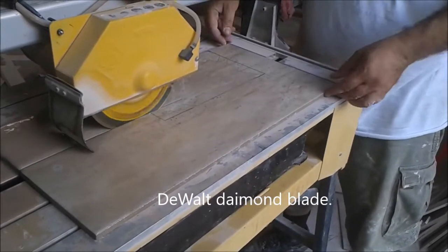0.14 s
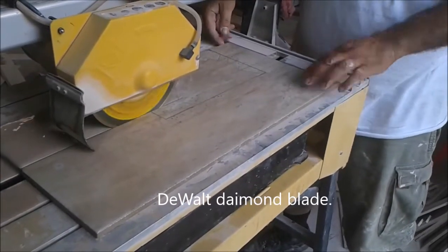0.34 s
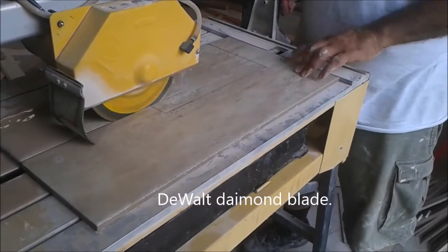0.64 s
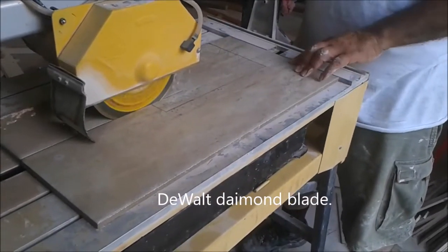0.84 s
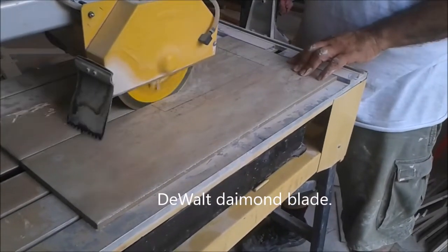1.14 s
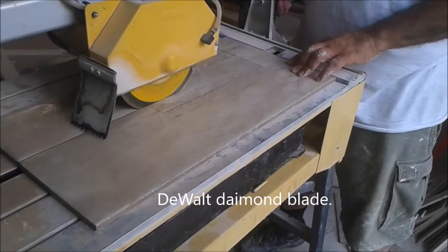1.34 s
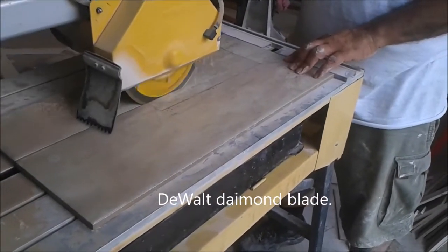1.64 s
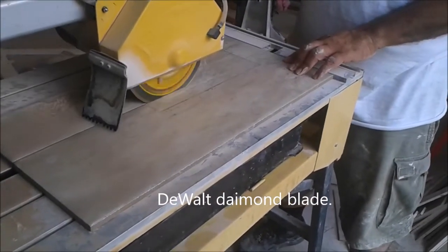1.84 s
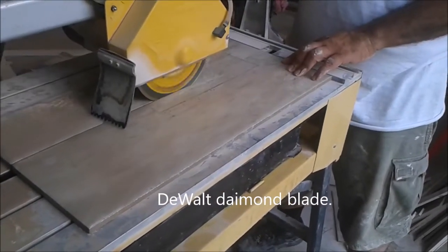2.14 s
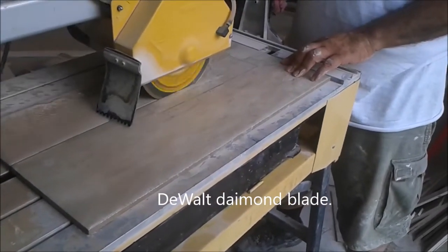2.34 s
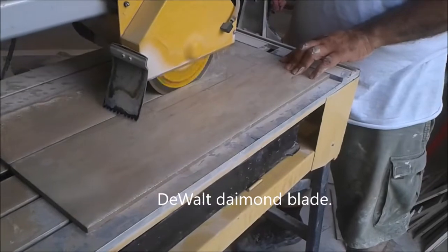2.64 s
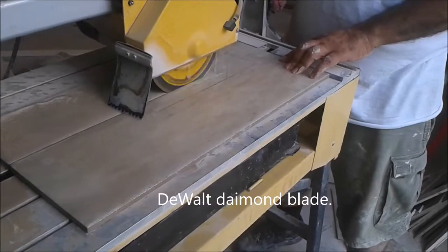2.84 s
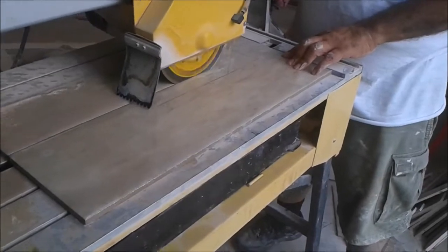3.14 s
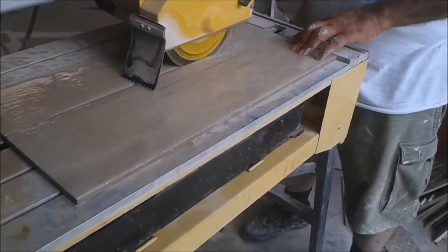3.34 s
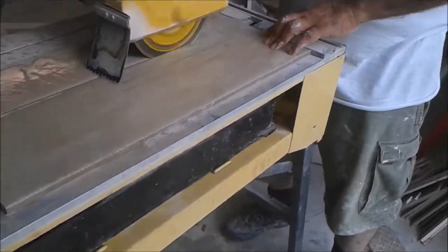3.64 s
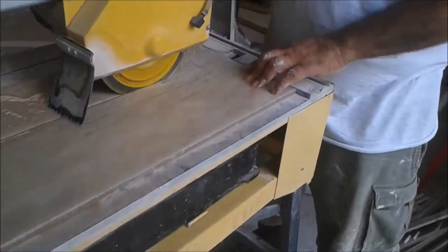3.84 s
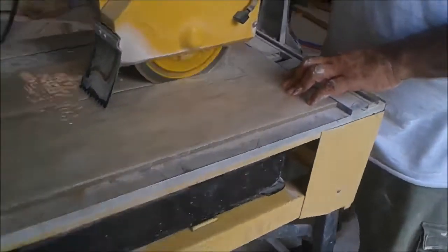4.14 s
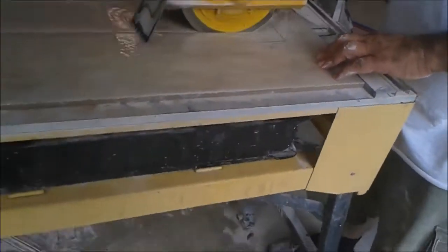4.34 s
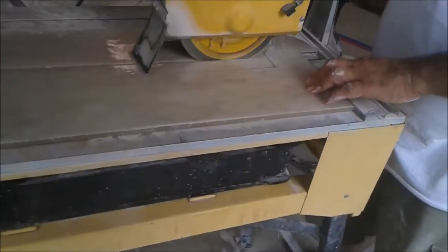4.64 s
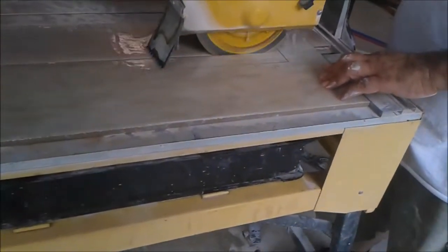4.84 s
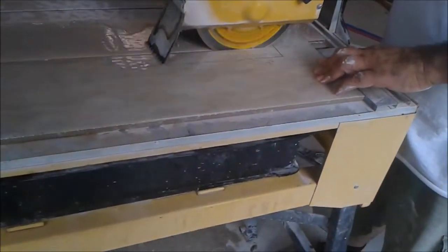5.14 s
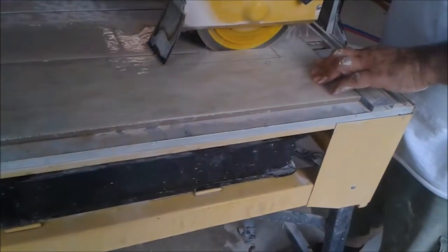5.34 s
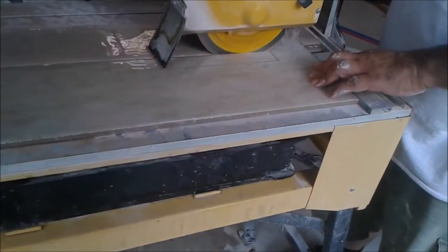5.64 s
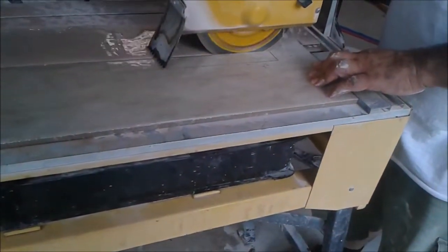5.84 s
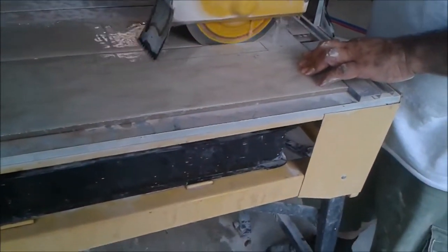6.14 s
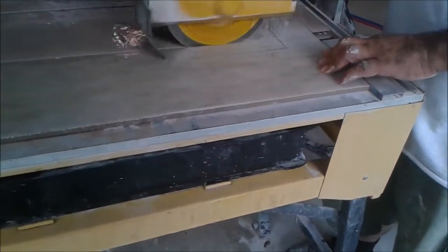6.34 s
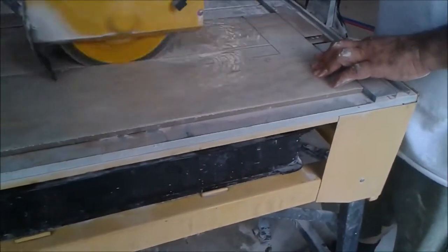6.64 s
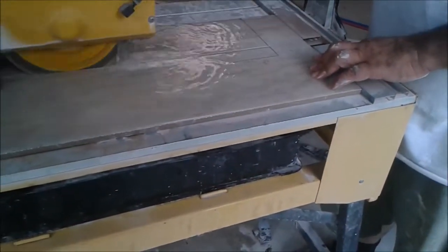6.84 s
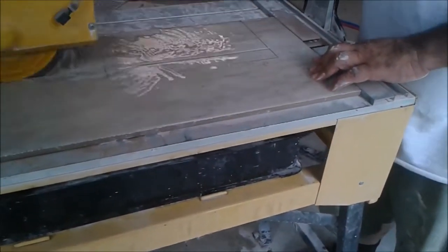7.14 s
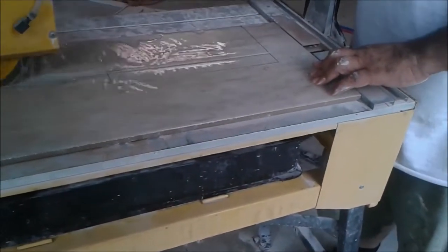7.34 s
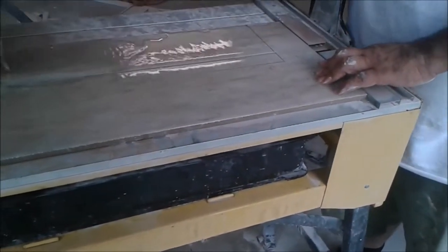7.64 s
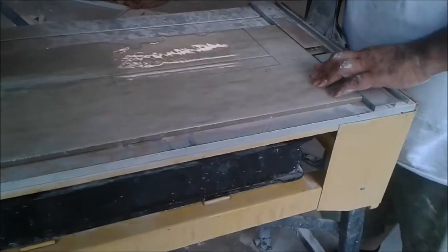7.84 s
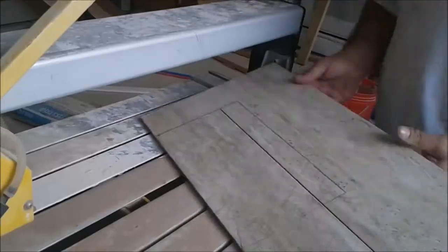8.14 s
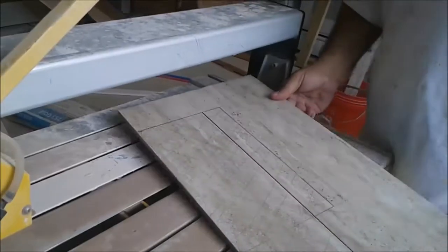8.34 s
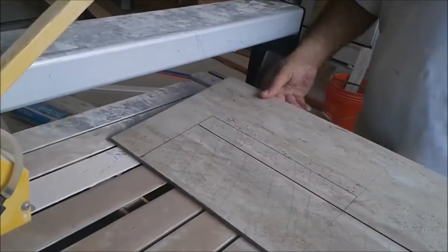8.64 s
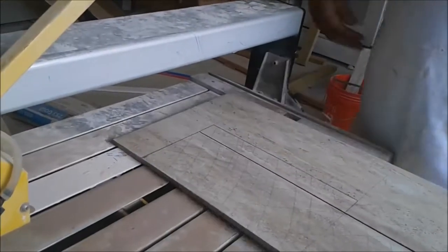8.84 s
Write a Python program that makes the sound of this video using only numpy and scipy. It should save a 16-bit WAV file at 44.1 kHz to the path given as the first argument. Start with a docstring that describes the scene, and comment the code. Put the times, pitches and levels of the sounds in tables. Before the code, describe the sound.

Close wet tile cutting: free blade ringing and rushing spray, then dense gritty hiss with shrill singing resonances and a whining guard over faint stand rumble. A brief lift interrupts the cut before a second bite. The saw vanishes quickly, leaving silence, then soft room hiss, one hard tile knock and a quick gritty slide. Stereo leans left, while low and mid sounds on the right flicker through gating.

```python
"""Wet tile saw, then tile set down

A saw spins free, bites into a large tile, sags under the feed, eases off and bites again.
Its blade's modes sing over the hiss of water and grit; all follow touch on the tile and shaft load.
Short tones flicker, the guard whines, the stand rumbles; a noise gate chops the quieter right side.
After a short silence the tile knocks down on the table, amid rising room hiss, and slides along it."""
import sys
import numpy as np
from scipy import signal
from scipy.fft import rfft, irfft
from scipy.io import wavfile
from scipy.ndimage import uniform_filter1d

SR = 44100
rng = np.random.default_rng(int(sys.argv[2]) if len(sys.argv) > 2 else 0)


def wav_out(sig):
    """Save sig, one row per channel (or a flat mono array), as 16-bit PCM at SR to the path in sys.argv[1]."""
    wavfile.write(sys.argv[1], SR, np.round(np.clip(np.atleast_2d(sig).T, -1, 1) * 32767).astype(np.int16))


N = 396018
TIME_S = np.arange(N) / SR
BINS_HZ = np.fft.rfftfreq(1024, 1 / SR)

# shaft speed, sagging under feed: time_s, speed_hz
SHAFT_SPEED = [(0, 118.97), (1.2, 118.97), (1.42, 114.9), (2.2, 113.2), (2.7, 114.6), (3.3, 113.6),
               (3.85, 115.7), (4.3, 113.9), (4.9, 115.9), (5.3, 115.5), (5.62, 118.4), (6.33, 118.7),
               (6.75, 116.3), (7.37, 115.9), (7.55, 118.4), (7.85, 119.3)]
# blade touches tile: start_s, end_s
CUTS = [(0.96, 6.17), (6.36, 7.5)]
# blade and guard resonances: pitch_hz, nominal_width_hz, relative left_db, relative right_db
BLADE_MODES = [(535, 60, -19, -18), (690, 70, -16, -11), (950, 90, -24, -21), (1310, 90, -20, -18),
               (1900, 130, -21, -12), (2080, 100, -19, -10), (2740, 330, -13, -8), (3000, 150, -13, -8),
               (3320, 90, -16, -12), (3850, 150, -21, -16), (4750, 250, -21, -15), (5220, 160, -21, -12),
               (5650, 200, -22, -16), (6500, 380, -16, -9), (7800, 380, -14, -9), (8410, 300, -2, -2.5),
               (8850, 170, -3, -4.5), (9250, 250, -10, -10), (9720, 480, -3, -4), (10200, 420, -6.5, -6),
               (10880, 200, 3.5, -0.5), (11280, 200, -5, -4), (11620, 250, -9, -9), (12000, 170, 3, 2),
               (12410, 180, 2.5, 2.5), (12980, 350, -6, -5), (13780, 500, -0.5, -0.5), (14260, 260, 0.5, 3),
               (14850, 500, -2, 0.5), (15600, 400, -1, 2.5)]
# narrow guard mode that rings on after the cut: same columns
GUARD_MODE = (2635.5, 50, -12, -9.5)
# single resonances that sing out or sink as contact moves along the rim (silent if start is well past end):
# pitch_hz, width_hz, start_s, end_s, change_db
FLARES = [(2780, 150, -1, 1.7, 2), (690, 70, 4.5, 6.4, 3), (2850, 250, 5.9, 6.5, 3), (2750, 250, 6, 7.5, 1),
          (2800, 300, 7.6, 8.1, 2.5), (8330, 130, 3.7, 4.0, 5), (8400, 130, 6.85, 6.3, -2),
          (8200, 280, 5.5, 8.4, 4), (10850, 130, 1.5, 2, 1.5), (10820, 130, 2.75, 3.3, 3),
          (10900, 140, 4.5, 3, 2.5), (11050, 130, 6, 6.4, 2), (10850, 180, 6, 7.45, -3),
          (11600, 110, 7.5, 6.7, 2.5), (12170, 200, -2, 1.1, 6), (12350, 110, 0.5, 1.75, 2),
          (12350, 120, 3, 3.65, 2.5), (12380, 150, 2, 4.15, 3.5), (12000, 130, 7.08, 7.38, 3),
          (13770, 220, 2.5, 4.2, 1.5), (14230, 160, 4.05, 4.3, 4), (14250, 200, 6.55, 7.35, -2),
          (14300, 180, 7.42, 7.65, 6), (15580, 200, 2, 3.7, 1), (15580, 200, 4, 5, 2),
          (15500, 800, 6, 8.1, -4)]
# brief hiss dips as the blade comes clear: start_s, end_s, change_db
LULLS = [(6.18, 6.338, -2.5), (7.56, 7.756, -5)]
# dip depth by pitch: pitch_hz, share
LULL_SHARE = [(200, 0.52), (600, 1.2), (1200, 1.9), (2200, 1.8), (2900, 0.98), (3700, 1.3), (4700, 1.44),
              (6400, 0.76), (8000, 0.48)]
# layer levels, rows left and right: free_db, added_by_touch_db, added_by_full_load_db
RING_LEVELS = [(-34.5, -0.5, -1.15), (-37, -0.2, 2)]
RUSH_LEVELS = [(-41, -1, -2), (-61, 6.5, 5.5)]
GRIND_LEVELS = [(-44.5, 3.97, 1.48), (-52, 1.3, 3)]
# clean tones of the free blade, rounded to shaft harmonics: pitch_hz, relative level_db
SINGING_TONES = [(2498, -58), (2735, -47), (2974, -57), (4402, -55), (6424, -56), (8328, -46), (8447, -56),
                 (9518, -58), (10110, -58), (10944, -52), (12015, -49), (12134, -41.5), (13679, -51),
                 (14040, -52), (14158, -43), (14277, -52), (14750, -58), (15466, -54)]
# motor whine: shaft_harmonic, level_db
MOTOR_TONES = [(4, -78), (8, -75.5), (11, -74.5), (22, -64), (24, -70)]
# water and air rush, grit hiss: pitch_hz, relative level_db per Hz
RUSH_SPECTRUM = [(30, -37.5), (60, -20.5), (110, -7.5), (180, -2.5), (350, 1.5), (800, 0.5), (2000, -3.5),
                 (5000, -12.5), (16000, -15.5)]
GRIT_SPECTRUM = [(40, -61.5), (150, -9), (400, -8), (1200, -0.5), (3000, 0), (7000, -0.5), (11000, 0),
                 (16000, -4)]
# shaking stand: pitch_hz, relative level_db per Hz
RUMBLE_SPECTRUM = [(40, -29.5), (90, -6), (140, 0), (220, -4.5), (400, -21), (1500, -60)]
# brief low bursts, as when the gate lets the bass through: start_s, relative level_db
LOW_BURSTS = [(0.265, -59), (0.372, -61), (0.52, -62), (1.65, -60.5), (1.859, -66), (2.268, -65),
              (3.036, -66), (3.412, -59), (3.66, -60), (4.307, -61.5), (4.51, -60.5), (4.92, -62),
              (5.918, -60), (6.237, -58.5), (6.853, -64), (7.71, -59)]
# guard tones under hard feed: shaft_harmonic, start_s, end_s, level_db at full load
GUARD_TONES = [(26, 1.3, 2.1, -52.5), (29, 1.4, 2.1, -56.5), (24, 1.4, 1.8, -52.5), (23, 1.75, 2.15, -55),
               (24, 2.3, 3.1, -58), (19, 4.4, 5.4, -57), (23, 4.45, 5.4, -53), (24, 4.45, 5.3, -55),
               (26, 4.4, 5.3, -57), (23, 6.5, 7.05, -52)]
# room hiss: pitch_hz, relative level_db per Hz
ROOM_SPECTRUM = [(24, -45), (40, -20.5), (87, -14), (123, -1), (162, -9), (333, -5), (1280, -12.5),
                 (8310, -9), (15500, -17)]
# landing blow: pitch_hz, relative level_db per Hz
BLOW_SPECTRUM = [(40, -38), (90, -20), (150, -21), (350, 3.5), (650, -1), (900, 0), (1500, 1), (3000, 0),
                 (5000, -5.5), (10000, -15), (16000, -28)]
# decay of the blow: pitch_hz, t60_s
BLOW_T60 = [(100, 0.41), (400, 0.58), (1500, 0.32), (4000, 0.13), (15000, 0.092)]
# modes of the tile on the table: pitch_hz, relative level_db, t60_s
TILE_MODES = [(166.5, -16, 1), (232, -9.5, 0.38), (290, -8.5, 0.35), (350, -4.5, 0.35), (418, -10, 0.45),
              (562, -3, 0.36), (740, -5, .2), (954, -8, 0.2), (1066, -9, 0.2), (1360, 7, 0.1),
              (1520, 0, 0.13), (1963, 4, 0.08), (2250, -9, .15), (2702, -16, .2), (2929, -9, .2)]
# sliding scrape: pitch_hz, relative level_db per Hz
SCRAPE_SPECTRUM = [(30, -31), (80, -24), (150, -23), (600, -1.5), (1500, -2.5), (2300, -4), (4000, 1.5),
                   (7000, 2.5), (9200, 3.5), (11500, -1.5), (13000, -8), (16000, -10)]
# gate thresholds: pitch_hz, threshold_db per Hz
GATE_THRESHOLD = [(30, -88.5), (55, -83), (100, -81), (160, -81), (250, -82), (1000, -78.5), (2000, -82.5),
                  (4000, -81.5), (7000, -80.5), (9000, -79), (16000, -77.5)]
# gain of a shut band: pitch_hz, gain_db
GATE_SHUT = [(50, -14.5), (110, -25), (300, -44.5), (16000, -44.5)]
# time the gate takes to stop following the dying saw: pitch_hz, time_s
GATE_FREEZE = [(2200, 0.066), (3000, 0.01)]

FREE_HZ, SAG_HZ = 118.97, 3.615  # free shaft speed, loss that counts as full load
TOUCH_S = 0.12  # time to bite in or come clear
FADE_S, SAW_END_S = 7.772, 8.008  # the saw's sound starts to fade out, is gone
RING_FADE = dict(db_per_s=160, depth_db=26)
RUSH_FADE = dict(db_per_s=860, depth_db=31)
GRIND_FADE = dict(db_per_s=220, depth_db=23.3)
KNOCK_S = 8.579  # tile lands
EDGE_HZ = 15780  # upper band limit


def amp(db):
    """Decibels to gain."""
    return 10 ** (np.asarray(db) / 20)


def evened(x):
    """Scales to unit power."""
    return x / np.sqrt(np.mean(x ** 2) + 1e-20)


def colour(points, hz=BINS_HZ):
    """Reads a curve on a log-frequency axis."""
    f, value = np.transpose(points)
    return np.interp(np.log(hz + 1), np.log(f), value)


def follow(rows, t):
    """Reads every column of a time curve at times t."""
    s, *columns = np.transpose(rows)
    return [np.interp(t, s, c) for c in columns]


def spectra(x, size=1024):
    """Short-time spectra: frame times and (channels, bins, frames)."""
    return signal.stft(x, SR, nperseg=size, noverlap=size - size // 4)[1:]


def waves(z, size=1024):
    """Short-time spectra back to sound."""
    return signal.istft(z, SR, nperseg=size, noverlap=size - size // 4)[1][..., :N]


def in_band(gain, lo_hz, hi_hz):
    """Scales a filter so white noise leaves it with unit power between two pitches."""
    band = (BINS_HZ > lo_hz) & (BINS_HZ < hi_hz)
    power = np.sum(gain[..., band, :] ** 2, -2, keepdims=True) / len(BINS_HZ)
    return gain / np.sqrt(power)


def drift(shape, rate_hz, step_s):
    """Slow chance of unit size along the last axis."""
    hz = np.fft.rfftfreq(shape[-1], step_s)
    spectrum = rfft(rng.standard_normal(shape)) / (1 + (hz / rate_hz) ** 4)
    return evened(irfft(spectrum, shape[-1]))


def patches(shape, bins=4, frames=14):
    """Random hills of unit size over frequency and time."""
    field = rng.standard_normal(shape)
    for _ in range(2):
        field = uniform_filter1d(field, bins, axis=1)
        field = uniform_filter1d(field, frames, axis=2)
    return evened(field)


def tinted(x, points):
    """Gives a sound a spectrum and unit power."""
    return evened(waves(spectra(x)[1] * amp(colour(points))[:, None]))


def gritty(grains_per_s, grain_db):
    """Left and right noise of unit power, half of it separate grains of uneven size."""
    hits = rng.random(N) < grains_per_s / SR
    grains = hits * amp(grain_db * np.minimum(rng.exponential(1, N), 3))
    grains = evened(grains * rng.choice([-1, 1], (2, N)))
    return evened(grains + rng.standard_normal((2, N)))


def held(t, start_s, end_s, ramp_s):
    """Rises to 1 around start, holds, falls to 0 around end."""
    return np.clip(np.minimum(t - start_s, end_s - t) / ramp_s + .5, 0, 1)


def touch(t):
    """Contact of blade and tile, 0-1."""
    return sum(held(t, start, end, TOUCH_S) for start, end in CUTS)


def loading(t):
    """Shaft load, 0-1, in step with its loss of speed."""
    return np.clip((FREE_HZ - follow(SHAFT_SPEED, t)[0]) / SAG_HZ, 0, 1)


def working(levels, t):
    """Left and right layer level in dB, following touch and load."""
    return np.array([free + by_touch * touch(t) + by_load * loading(t) for free, by_touch, by_load in levels])


def fading(t, db_per_s, depth_db):
    """Steady fall in dB as the saw's sound fades out."""
    return -np.clip((t - FADE_S) * db_per_s, 0, depth_db)


def lull(t, ramp_s=0.11):
    """Brief dips of the hiss, in dB."""
    return sum(db * held(t, start, end, ramp_s) for start, end, db in LULLS)


def flares(t, ramp_s=0.13):
    """Extra dB over frequency and time as single resonances sing out or sink."""
    total_db = 0
    for hz, width, start, end, db in FLARES:
        bump = np.exp(-((BINS_HZ - hz) / width) ** 4)
        total_db = total_db + db * np.outer(bump, held(t, start, end, ramp_s))
    return total_db


def shaft(wobble_hz=.4, flutter_hz=0.01465):
    """Shaft turns and load: the blade grabs unevenly, so a loaded shaft wavers."""
    load = loading(TIME_S)
    waver_hz = (flutter_hz + wobble_hz * load) * drift((N,), 7, 1 / SR)
    return np.cumsum(follow(SHAFT_SPEED, TIME_S)[0] + waver_hz) / SR, load


def rim(turns, size=4096, harmonics=135):
    """The uneven diamond rim repeats one rough pattern every turn."""
    phases = np.exp(2j * np.pi * rng.random(harmonics))
    sizes = amp(2.5 * rng.standard_normal(harmonics))
    pattern = irfft(np.r_[0, phases * sizes], size)
    return evened(np.interp(turns % 1 * size, np.arange(size + 1), np.r_[pattern, pattern[0]]))


def blade(turns, load, wander_db=1.16, patchy_db=2.1, width_scale=0.59, pinch_drop=0.0065, split_hz=11500):
    """Rim pattern and grit noise drive the blade's resonances, which swell and fade as contact moves."""
    regular = .52 - .17 * load  # share of power in the rim pattern
    pattern = np.array([rim(turns), rim(turns)])
    drive = np.sqrt(regular) * pattern + np.sqrt(1 - regular) * rng.standard_normal((2, N))
    t, z = spectra(drive)
    fade_db = fading(t, **RING_FADE)
    hz, width, *sides_db = np.transpose(BLADE_MODES + [GUARD_MODE])

    # the cut pinches the blade and lowers its modes
    pinched = held(t, 1, 4.25, 0.3)
    free, tight = [(1 + ((BINS_HZ[:, None] - f) / (width_scale * width)) ** 2) ** -2
                   for f in (hz, hz * (1 - pinch_drop))]

    swell_db = wander_db * drift((len(hz), len(t)), 12.0, t[1])
    narrow_low = ((hz < 4000) * GUARD_MODE[1] / width).clip(0, 1)
    swell_db -= 0.63 * fade_db * narrow_low[:, None]  # narrow low modes die away last
    swell_db[hz < 2400] += 0.9 * lull(t)  # lowest modes dip with the hiss
    swell_db[-1] -= 0.8 * lull(t)  # guard mode rings out as the hiss dips
    power = amp(np.array(sides_db)[:, :, None] + swell_db) ** 2
    gain = np.sqrt(free @ (power * (1 - pinched)) + tight @ (power * pinched))
    gain = in_band(gain * amp(patchy_db * patches(z.shape)), 8000, EDGE_HZ)

    top = .5 + .5 * np.tanh((BINS_HZ[:, None] - split_hz) / 300)
    middle = (1 - top) * (BINS_HZ[:, None] > 8600)
    top_db = top * 0.5 * (1.5 - touch(t))  # louder while clear of the tile
    middle_db = middle * 4.7 * held(t, 4.33, 6.52, 0.13)  # louder for a while
    gain *= amp(top_db + middle_db + flares(t))
    dip_db = np.outer((.1, 0.51), lull(t))  # left and right share of the dips
    level_db = working(RING_LEVELS, t) + dip_db + fade_db
    return waves(z * gain * amp(level_db)[:, None])


def singing(turns, load, waver_db=2.0, damping_db=20, level_db=-4.0, groove_db=-5, right_db=-4):
    """Shaft harmonics ring clean until the tile damps the blade."""
    t = np.arange(0, TIME_S[-1], .05)
    wavers = drift((len(SINGING_TONES), len(t)), 4.4, t[1])
    tones = np.zeros(N)
    for (hz, db), waver in zip(SINGING_TONES, wavers):
        level = amp(db + waver_db * np.interp(TIME_S, t, waver))
        tones += level * np.sin(2 * np.pi * (round(hz / FREE_HZ) * turns + rng.random()))
    in_groove = np.clip((TIME_S - CUTS[0][0]) / 0.24, 0, 1)
    gain_db = level_db - damping_db * load + groove_db * in_groove + fading(TIME_S, **RING_FADE)
    return tones * amp(gain_db) * amp([[0], [right_db]])


def motor(turns, waver_db=0.5):
    """The motor's faint whine on a few shaft harmonics, bared as the rest of the saw's sound fades out."""
    t = np.arange(0, TIME_S[-1], .005)
    out = np.zeros((2, N))
    for harmonic, db in MOTOR_TONES:
        level = np.interp(TIME_S, t, amp(db + waver_db * drift((len(t),), 12, t[1])))
        out += level * np.sin(2 * np.pi * (round(harmonic) * turns + rng.random((2, 1))))
    return out


def spray(grains_per_s=9000, grain_db=0.76, flicker_db=0.57, patchy_db=(1.28, 3.5), clear_patchy_db=3):
    """Flung water and air rush, diamond grit hisses, ragged while clear; both blow toward the left."""
    t, z = spectra(gritty(grains_per_s, grain_db))
    dip_db = np.outer((0.94, 0.17), lull(t))[:, None] * colour(LULL_SHARE)[:, None]
    water_db = working(RUSH_LEVELS, t) + fading(t, **RUSH_FADE)
    grind_db = working(GRIND_LEVELS, t) + fading(t, **GRIND_FADE)
    rush = in_band(amp(colour(RUSH_SPECTRUM))[:, None], 100, 1400)
    grit = in_band(amp(colour(GRIT_SPECTRUM))[:, None], 3500, 7500)
    gain = np.hypot(rush * amp(water_db)[:, None], grit * amp(grind_db)[:, None])
    z = z * amp(np.array(patchy_db)[:, None, None] * patches(z.shape, 2, 10))
    ragged = (patches(z.shape, 2, 7) - .3) * (1 - touch(t)) * np.clip(BINS_HZ / 2500, 0, 1)[:, None]
    hiss = waves(z * gain * amp(dip_db + clear_patchy_db * ragged))
    return hiss * amp(flicker_db * drift((2, N), 40, 1 / SR))


def low_bursts(burst_hz=72, rise_s=0.009, left_db=3, right_db=-3):
    """Brief low bursts, as when the gate lets the bass through: a low tone swells and decays."""
    t, starts = np.arange(SR // 5) / SR, np.zeros(N)
    for s, db in LOW_BURSTS:
        starts[round(s * SR)] = amp(db)
    swell = (t / rise_s) ** 2 * np.exp(-t / rise_s)
    burst = swell / swell.max() * np.sin(2 * np.pi * burst_hz * t)
    return signal.oaconvolve(starts, burst)[:N] * amp([[left_db], [right_db]])


def flickers(size=4096, lo_hz=1894, hi_hz=7400, per_s=100, t60_s=0.1, floor_db=-55, spread_db=3.0):
    """Short narrow tones at random pitches flicker through the gate while the blade touches."""
    out, t = np.zeros((2, N + size)), np.arange(size) / SR
    decay = amp(-60 * t / t60_s)
    draws = rng.random((2400, 5))
    for when, pitch, strength, side, chance in draws:
        s = when * FADE_S
        if chance < per_s * FADE_S / len(draws) * touch(s):
            tone = decay * np.sin(2 * np.pi * (lo_hz + pitch * (hi_hz - lo_hz)) * t)
            level_db = floor_db - spread_db * np.log(max(strength, np.exp(-2)))
            start = round(s * SR)
            out[:, start:start + size] += np.sqrt([[1 - side], [side]]) * tone * amp(level_db)
    return out[:, :N]


def stand(load, left_db=-72, right_db=-61.0, surge_db=2.5):
    """The shaking stand rumbles as load grows: low noise with slow surges."""
    level_db = np.array([[left_db], [right_db]]) + surge_db * drift((N,), 9, 1 / SR)
    return tinted(rng.standard_normal((2, N)), RUMBLE_SPECTRUM) * load * amp(level_db)


def whine(turns, load, waver_db=2.5, smear_turns=0.004, ramp_s=0.15):
    """Under load shaft harmonics sing in the guard, sagging with speed and swelling one by one."""
    t = np.arange(0, TIME_S[-1], .005)
    swells = drift((len(GUARD_TONES), len(t)), 7.2, t[1])
    smears = drift((2, len(t)), 25, t[1])
    angle = turns + smear_turns * np.array([np.interp(TIME_S, t, smear) for smear in smears])
    out = np.zeros((2, N))
    for (harmonic, start, end, db), swell in zip(GUARD_TONES, swells):
        span = slice(round((start - ramp_s) * SR), round((end + ramp_s) * SR))
        level = amp(db + waver_db * np.interp(TIME_S[span], t, swell))
        level = level * held(TIME_S[span], start, end, ramp_s)
        out[:, span] += level * np.sin(2 * np.pi * (round(harmonic) * angle[:, span] + rng.random((2, 1))))
    return out * load


def room_air(start_s=8.281, rise_s=0.69, curve=0.79, left_db=-49.5, right_db=-51.5):
    """The room's hiss: coloured noise that fades in."""
    fade_in = np.clip((TIME_S - start_s) / rise_s, 0, 1) ** curve
    hiss = tinted(rng.standard_normal((2, N)), ROOM_SPECTRUM)
    return hiss * amp([[left_db], [right_db]]) * fade_in


def knock(size=22050, shared=0.68, blow_db=-32.5, tile_db=-37.5, body_db=2.0, body_hz=750, crack_s=.0004,
          bloom_s=0.0089, right_db=-1.5):
    """The tile lands: a crack, ringing modes, and the table's low thump swelling and dying away."""
    t = np.arange(size) / SR
    noise = rng.standard_normal((2, size)) + shared * rng.standard_normal(size)
    frame_s, z = spectra(noise, size=256)
    hz = np.fft.rfftfreq(256, 1 / SR)
    decay = amp(-60 * frame_s / colour(BLOW_T60, hz)[:, None])
    blow = waves(z * evened(amp(colour(BLOW_SPECTRUM, hz)))[:, None] * decay, size=256)[:, :size]
    ring = np.zeros((2, size))
    for f, db, t60 in TILE_MODES:
        tone = np.sin(2 * np.pi * f * t + rng.uniform(0, 1.2, (2, 1)))
        ring += amp(db - 60 * t / t60) * tone * rng.choice([-1, 1])
    hit = amp(blow_db) * blow + amp(tile_db) * ring

    # the table's body, below body_hz, swells after the crack
    low_pass = 1 / (1 + (np.fft.rfftfreq(2 * size, 1 / SR) / body_hz) ** 8)
    body = irfft(rfft(hit, 2 * size) * low_pass)[:, :size]
    crack = (hit - body) * (1 - np.exp(-t / crack_s))
    hit = crack + amp(body_db) * body * (1 - np.exp(-t / bloom_s))
    return np.pad(hit * amp([[0], [right_db]]), ((0, 0), (round(KNOCK_S * SR), 0)))[:, :N]


def stroke(rest_s=0.014, full_s=8.713, stop_s=8.803, curve=0.61, surge_s=0.052, surge_db=1.5):
    """Slide strength: rests, gathers speed, sticks and slips, stops fast, leaves a room tail."""
    start_s = KNOCK_S + rest_s
    rise = np.clip((TIME_S - start_s) / (full_s - start_s), 0, 1) ** curve
    slip_db = surge_db * np.cos(2 * np.pi * (np.minimum(TIME_S, stop_s) - full_s) / surge_s)
    after_s = np.maximum(TIME_S - stop_s, 0)
    stop_db = np.maximum(-433 * after_s, -9.5 - 105 * after_s)  # fast stop, then slower tail
    return rise * amp(slip_db + stop_db)


def slide(grains_per_s=9000, grain_db=1.0, left_db=-30.5, right_db=-33.5, comb_db=3.5, patchy_db=2.6,
          body_db=4.5, judder_db=1.0):
    """Crushed sand under the juddering tile excites its low modes and close, shifting high ones."""
    z = spectra(gritty(grains_per_s, grain_db))[1]
    body = sum(amp(db) / (1 + ((BINS_HZ - hz) / 50) ** 2) for hz, db, _ in TILE_MODES)
    modes_db = comb_db * drift((2, len(BINS_HZ)), 0.46, 1) + body_db * body  # drift runs along the bins
    gain_db = modes_db[:, :, None] + patchy_db * patches(z.shape, 2, 6)
    sound = tinted(waves(z * amp(gain_db)), SCRAPE_SPECTRUM)
    level_db = judder_db * drift((N,), 80.2, 1 / SR) + np.array([[left_db], [right_db]])
    return sound * stroke() * amp(level_db)


def scene():
    """The saw, a silence, then the tile handled over the room's hiss."""
    turns, load = shaft()
    saw = blade(turns, load) + singing(turns, load) + motor(turns) + spray()
    saw = saw + low_bursts() + flickers() + stand(load) + whine(turns, load)
    saw = saw * np.clip((SAW_END_S - TIME_S) / 0.018, 0, 1)
    saw = saw * amp(0.89 * held(TIME_S, 4.25, np.inf, 0.26))  # the microphone moves closer, in dB
    return saw + room_air() + knock() + slide()


def record(dry, release_s=0.084):
    """A gate shuts bands whose smoothed power is under threshold, lets go after the saw; then a low-pass."""
    t, z = spectra(dry)
    per_hz = abs(z) ** 2 * 2 / (1.5 * BINS_HZ[1])
    power = uniform_filter1d(uniform_filter1d(per_hz, size=9, axis=2), size=2, axis=1)
    under = amp(colour(GATE_THRESHOLD))[:, None] ** 2 / (abs(power) + 1e-16)
    gain = np.maximum(1 / (1 + under ** 9), amp(colour(GATE_SHUT))[:, None])

    # as the saw's sound fades out the gate keeps its shut bands, then opens
    frozen = gain[:, :, [np.searchsorted(t, FADE_S)]]
    last = frozen ** np.clip(1 - (t - FADE_S) / release_s, 0, 1)
    released = np.clip((t - FADE_S) / colour(GATE_FREEZE)[:, None], 0, 1) ** 2
    released = released * np.clip((BINS_HZ[:, None] / 420) ** 4 + (t > SAW_END_S), 0, 1)  # bass opens last
    gated = waves(z * (gain + (last - gain) * released))
    low_pass = signal.firwin(1023, EDGE_HZ, window=("kaiser", 8), fs=SR)
    return signal.oaconvolve(gated, low_pass[None], "same")


dry = scene()
out = record(dry)
wav_out(out)
```